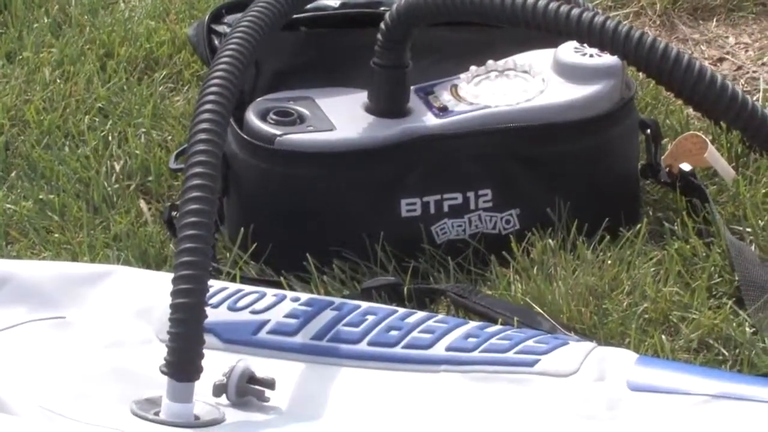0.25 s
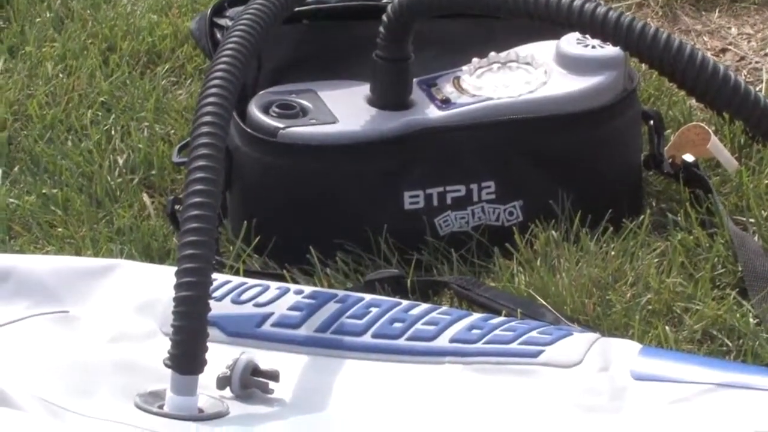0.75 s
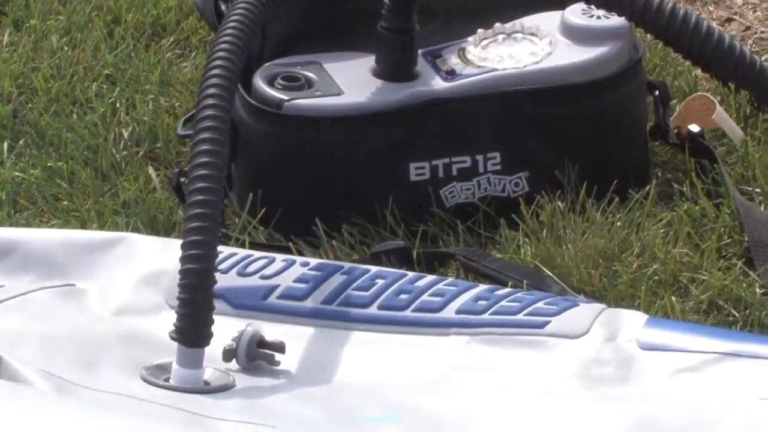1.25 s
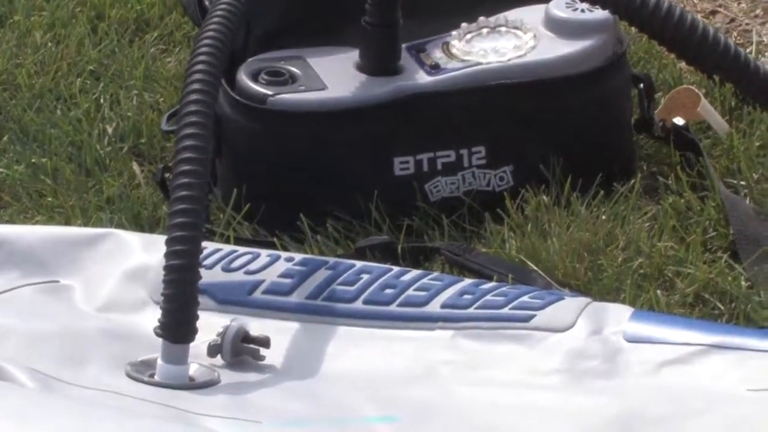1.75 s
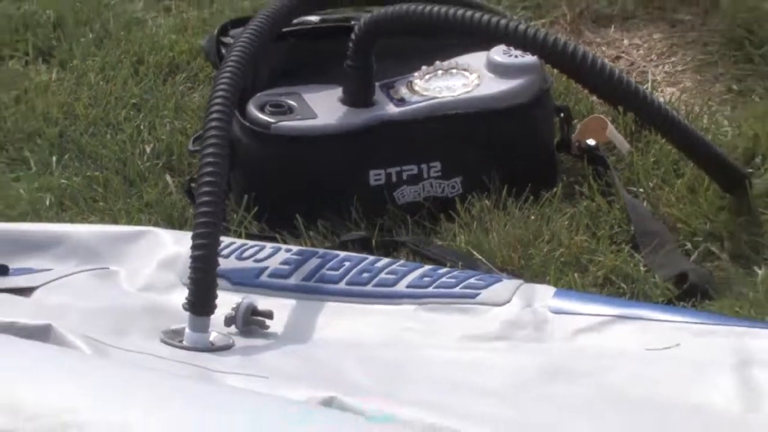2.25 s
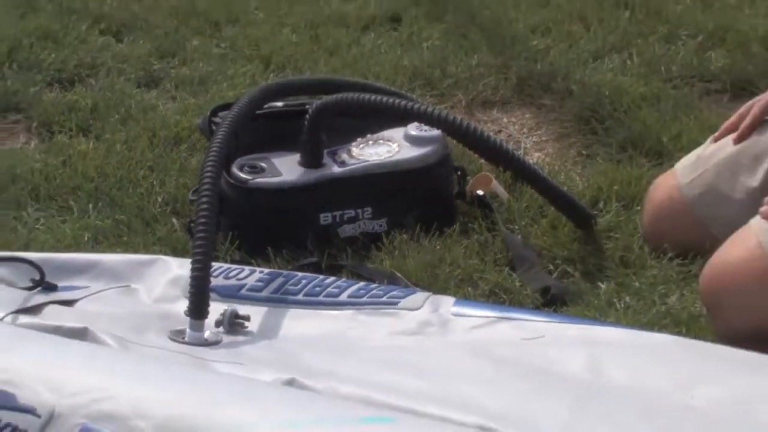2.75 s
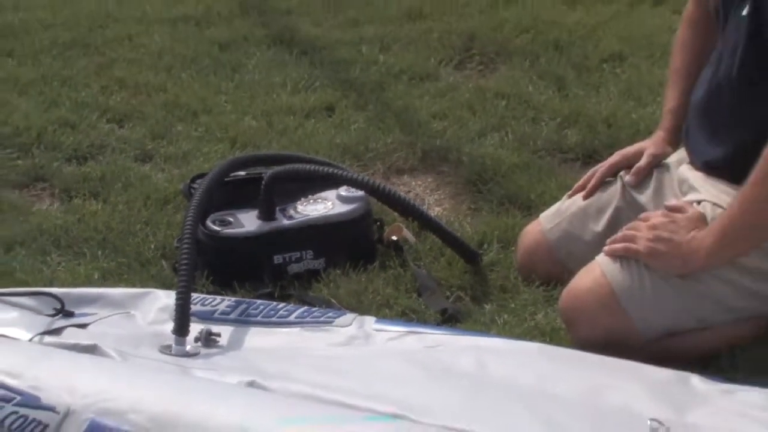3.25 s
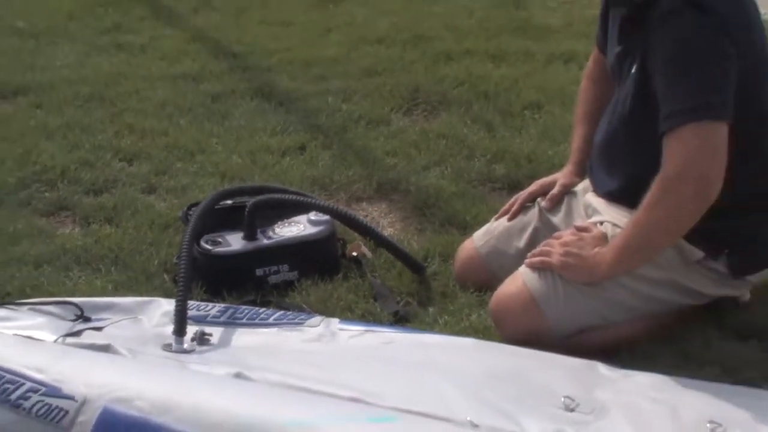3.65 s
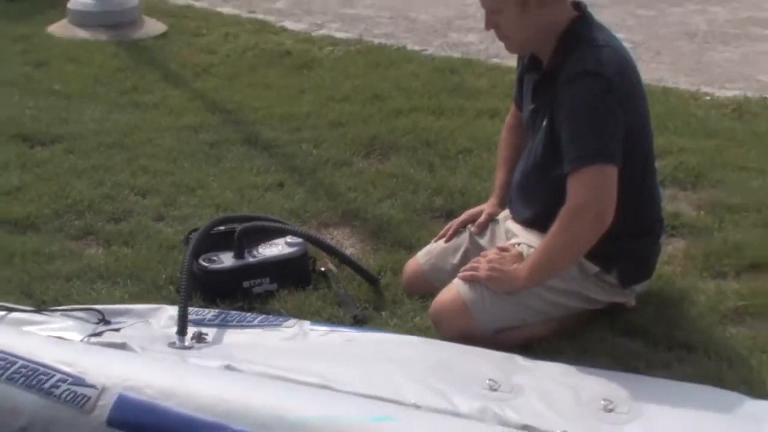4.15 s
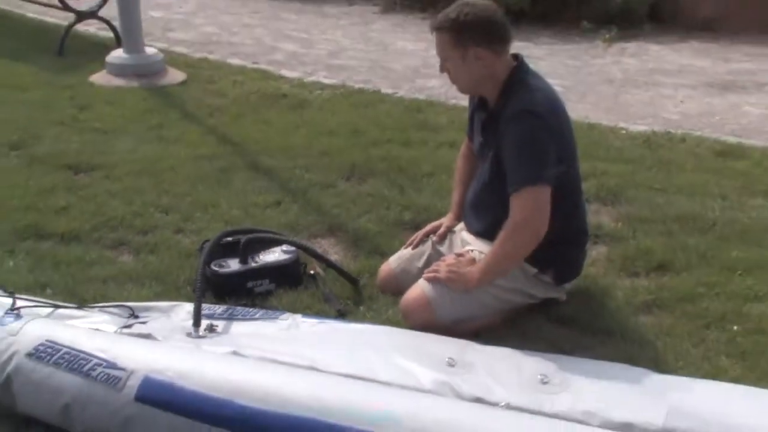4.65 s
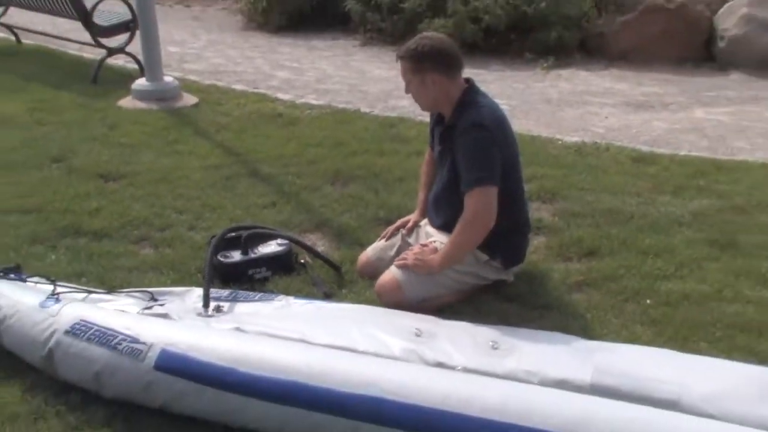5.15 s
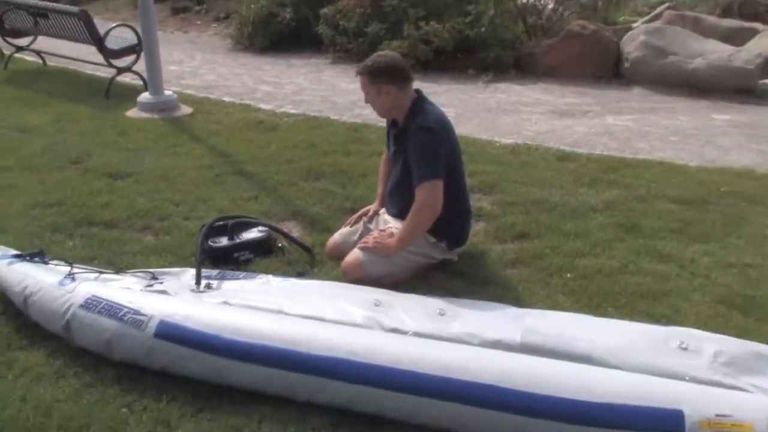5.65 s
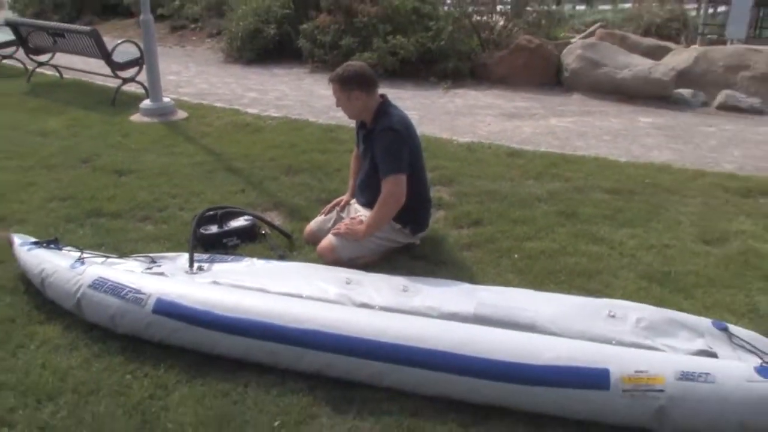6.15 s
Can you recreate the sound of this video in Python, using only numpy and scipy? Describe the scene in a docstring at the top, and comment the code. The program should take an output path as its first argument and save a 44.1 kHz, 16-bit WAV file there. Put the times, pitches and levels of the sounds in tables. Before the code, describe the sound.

Loud continuous electric inflator hum, nearly one pure pitch, rises slightly at the start, then holds while air rushes faintly through a hose outdoors.

```python
"""Turbine pump filling a boat

On a lawn, a small turbine pump blows air through a ribbed hose into a boat.
The rotor, just reaching full speed, is a set of cosines: a hum at its turning rate, overtones, a blade whine.
Turbulent air is noise through resonances: the hose rings, the casing and valve hiss and brighten as the
hull fills. Behind them lie a faint outdoor rumble and a low drone."""
import sys
import numpy as np
from scipy import signal
from scipy.io import wavfile

SR = 44100
rng = np.random.default_rng(int(sys.argv[2]) if len(sys.argv) > 2 else 0)


def store_pcm(level_fs):
    """Save levels as 16-bit WAV."""
    pcm = np.round(np.clip(level_fs, -1, 1) * 32767).astype(np.int16)
    wavfile.write(sys.argv[1], SR, np.atleast_2d(pcm).T)


N = 281886  # length in samples


def from_db(db):
    """Turn decibels into a plain factor."""
    return 10 ** (np.asarray(db) / 20)


def rms_one(x):
    """Scale a signal to an rms level of 1."""
    return x / np.sqrt(np.mean(x ** 2) + 1e-20)


def in_time(rows):
    """Draw straight lines between timed rows; gives one curve per column after the time."""
    seconds, *columns = np.transpose(rows)
    return [np.interp(np.arange(N) / SR, seconds, column) for column in columns]


def drift(rate_hz):
    """Slow random movement with a spread of 1: noise smoothed twice, so little is left above the rate."""
    step = 40  # samples between computed points
    pole = np.exp(-2 * np.pi * rate_hz * step / SR)
    noise = rng.standard_normal(N // step + 2002)
    slow = signal.lfilter([1], [1, -2 * pole, pole * pole], noise)[2000:]  # skip the filter's start
    return np.interp(np.arange(N) / step, np.arange(len(slow)), rms_one(slow))


def turbulence(resonances, patchy_db, rate_hz):
    """Each resonance is rung by its own noise and flickers alone; the sum has rms 1."""
    out = np.zeros(N)
    for hz, width_hz, top_db in resonances:
        r = np.exp(-np.pi * width_hz / SR)
        stage = [(1 - r * r) / 2, 0, (r * r - 1) / 2, 1, -2 * r * np.cos(2 * np.pi * hz / SR), r * r]
        noise = rng.standard_normal(N + 8000)
        rung = signal.sosfilt([stage, stage], noise)[8000:]  # two passes give steep skirts
        out += from_db(top_db + patchy_db * drift(rate_hz)) * rung
    return rms_one(out)


def tone(angle, db):
    """A cosine of the given rms level."""
    return np.sqrt(2) * from_db(db) * np.cos(angle)


def by_state(row, short, filled):
    """Level in dB from the working level, the shortfall in speed and the filling of the hull."""
    at_speed_db, short_db, filled_db = row[:3]
    return at_speed_db + short_db * short + filled_db * filled


# Outdoor rumble. Each row: frequency in Hz, width of one filter pass in Hz, relative level at the top in dB.
RUMBLE_RESONANCES = [(19.5, 40, -18), (48, 26, -3), (75, 14, -1.5), (90, 15, 1), (124, 30, -1),
                     (167, 76, -6.5), (250, 117, -3.5)]
RUMBLE_DB = -55


def outdoor_rumble():
    """Faint rumble of the open air: noise in low, patchy bands."""
    return from_db(RUMBLE_DB) * turbulence(RUMBLE_RESONANCES, patchy_db=2.75, rate_hz=2.5)


# The drone swells and fades. Each row: time in seconds, level in dB.
DRONE_LEVELS = [(0, -62), (.5, -68), (1.2, -69), (2, -59), (3.2, -55.5), (4, -56.5), (4.8, -62),
                (5.5, -68.5), (6.39, -66)]
DRONE_HZ = 46.5


def low_drone():
    """One low cosine whose level swells, fades and wavers."""
    level_db = in_time(DRONE_LEVELS)[0] + 0.86 * drift(2.7)
    return tone(2 * np.pi * DRONE_HZ * np.arange(N) / SR, level_db)


# Valve resonances. Each row: frequency in Hz, width of one filter pass in Hz, relative level at the top in dB.
VALVE_RESONANCES = [(7330, 910, 0), (7930, 130, -0.5), (8100, 320, -3.5), (11620, 500, -5.5),
                    (12500, 770, -3)]
# Valve loudness: level at working speed in dB, dB gained while short of speed, dB gained as the hull fills.
VALVE_LEVEL = (-54.5, 1.1, 5.5)


def valve_jet(short, filled):
    """The jet at the valve: high bands of turbulence that grow clearly as the hull fills."""
    return from_db(by_state(VALVE_LEVEL, short, filled)) * turbulence(VALVE_RESONANCES, 0.8, rate_hz=6.5)


# Casing resonances. Each row: frequency in Hz, width of one filter pass in Hz, relative level at the top in dB.
CASING_RESONANCES = [(2610, 180, -1), (2900, 210, -10.5), (3250, 990, -2), (3970, 980, -3.5),
                     (4520, 540, -5.5), (5075, 900, 1.5), (5495, 240, 0), (5810, 1100, -1), (6490, 320, -1),
                     (8920, 1800, -13), (9900, 580, -10), (10780, 1150, -10), (13320, 660, -0.5),
                     (13800, 540, -18), (15000, 840, -13)]
# Casing loudness: level at working speed in dB, dB gained while short of speed, dB gained as the hull fills.
CASING_LEVEL = (-48, 0.34, 1)


def casing_hiss(short, filled):
    """Air hissing from the casing: broad bands of turbulence."""
    return from_db(by_state(CASING_LEVEL, short, filled)) * turbulence(CASING_RESONANCES, 0.85, rate_hz=6.3)


# Hose resonances. Each row: frequency in Hz, width of one filter pass in Hz, relative level at the top in dB.
HOSE_RESONANCES = [(357, 270, -7), (461.5, 55, 9), (648.6, 114, 0), (696, 103, -3), (774, 80, -7),
                   (948, 163, -8.5), (1121, 184, -5), (1294, 230, -9.5), (1417, 72, -18), (1488, 98, -3.5),
                   (1542, 110, -2), (1669, 94, -0.5), (1757, 150, -7), (1980, 170, -5.5), (2105, 210, -11),
                   (2226, 110, -9), (2335, 83, -13.5), (2480, 60, -18)]
# Hose loudness: level at working speed in dB, dB gained while short of speed, dB gained as the hull fills.
HOSE_LEVEL = (-38, -3, 0.54)


def hose_rush(short, filled):
    """Turbulent air rings the many resonances of the ribbed hose."""
    return from_db(by_state(HOSE_LEVEL, short, filled)) * turbulence(HOSE_RESONANCES, 0.52, rate_hz=3.2)


def air(angle, short, filled):
    """Casing and valve flutter together; all the air throbs slightly once a turn."""
    throb = from_db(0.6 * np.sin(angle))
    flutter = from_db(0.31 * drift(2.6) + 0.36 * drift(40))
    hiss = casing_hiss(short, filled) + valve_jet(short, filled)
    return throb * (hose_rush(short, filled) + flutter * hiss)


# Which multiples of the turning rate the overtones have, in the order of the rows below.
OVERTONE_MULTIPLES = [2, 4, 5, 6, 7, 9, 27]
# Each row: level at working speed in dB, dB gained while short of speed, dB gained as the hull fills,
# sharpness of settling (a power of the shortfall, no unit), slow wander once at speed in dB.
OVERTONE_LEVELS = [(-41, -4, 0.2, 4, 0.37), (-55, 12.5, 4.5, 2.1, 1), (-58, -13, 2, 6, 1.5),
                   (-71, 23, -4, 1.7, 2.5), (-59, 7, 2.1, 0.98, 1.2), (-57.5, -3, -3.5, 1.1, 2),
                   (-66.5, 7, 5, 3.7, 2.5)]
WANDER_HZ = 0.95
# The strong third multiple and the blade whine, as multiples of the turning rate.
SWELLING_MULTIPLES = [3, 18]
# They swell and fade. Each row: time in seconds, third multiple in dB, blade whine in dB.
SWELLING_LEVELS = [(0, -50, -74), (.16, -43.5, -56), (.4, -44.5, -65), (.7, -39, -67), (1.1, -40.5, -67),
                   (1.5, -39, -66), (2.05, -40, -61), (2.5, -42, -66), (2.95, -38, -68), (3.4, -38, -57),
                   (3.85, -39, -56), (4.3, -40.5, -61), (4.75, -39.5, -56), (5.3, -39.5, -65),
                   (6.39, -40.5, -64)]
# Faint overtones, as multiples of the turning rate, then the average level of each in dB.
FAINT_MULTIPLES = [8, 11, 12, 15, 17]
FAINT_LEVELS = [-66.5, -74, -71, -67.5, -66.5]


def rotor(angle, hum_db, short, filled, low_waver_db, high_waver_db):
    """Unbalance pushes once a turn; multiples 2 and 3 peak with it, higher ones start at random
    phases and waver more."""
    levels = []
    for row in OVERTONE_LEVELS:
        sharpness, wander_db = row[3:]
        wander = wander_db * (1 - short) * drift(WANDER_HZ)
        levels.append(by_state(row, short ** sharpness, filled) + wander)
    levels += in_time(SWELLING_LEVELS) + list(FAINT_LEVELS)
    multiples = [*OVERTONE_MULTIPLES, *SWELLING_MULTIPLES, *FAINT_MULTIPLES]

    out = tone(angle, hum_db)
    for multiple, level_db in zip(multiples, levels):
        if multiple <= 3:
            start_phase, waver_db = 0, low_waver_db
        else:
            start_phase, waver_db = rng.uniform(0, 2 * np.pi), high_waver_db
        out += tone(multiple * angle + start_phase, level_db + waver_db * drift(12))
    return out


# The rotor's run. Each row: time in seconds, speed in turns per second, level of the hum in dB.
ROTOR_RUN = [(0, 446.0, -20.6), (0.14, 450.9, -20.8), (0.28, 455.6, -20.3), (0.42, 458.1, -19.8),
             (0.56, 458.7, -20.1), (0.78, 459.8, -20.4), (1.35, 459.2, -20.8), (1.9, 460.6, -20.2),
             (2.35, 459.6, -20.3), (2.65, 461.4, -19.9), (3.15, 460.2, -19.5), (3.52, 460.3, -19.4),
             (3.77, 461.6, -19.3), (4.15, 460.4, -19.3), (4.28, 461.0, -19.5), (4.53, 460.4, -19.6),
             (4.78, 462.0, -19.0), (5.15, 461.1, -19.3), (5.65, 461.3, -19.4), (5.8, 462.9, -19.5),
             (6.05, 462.5, -18.9), (6.39, 461.7, -19.4)]
START_TURNS, FULL_TURNS = 446, 459.5  # turns per second at the start and at working speed


def scene():
    """Pump and surroundings, in mono."""
    turns, hum_db = in_time(ROTOR_RUN)
    angle = 2 * np.pi * np.cumsum(turns) / SR + np.pi / 2  # shaft angle in radians
    short = np.clip((FULL_TURNS - turns) / (FULL_TURNS - START_TURNS), 0, 1)  # shortfall in speed, 0-1
    filled = np.arange(N) / N  # the hull fills steadily, 0-1
    surroundings = outdoor_rumble() + low_drone()
    spinning = rotor(angle, hum_db, short, filled, low_waver_db=0.68, high_waver_db=1.1)
    return (surroundings + air(angle, short, filled) + spinning)[None]


LOW_CUT_HZ, TOP_CUT_HZ = 12, 15050


def record(dry):
    """The microphone drops the deep bass; the top is cut steeply."""
    low_cut = signal.butter(2, LOW_CUT_HZ, "high", fs=SR, output="sos")
    top_cut = signal.ellip(14, 0.05, 74, TOP_CUT_HZ, fs=SR, output="sos")
    return signal.sosfilt(top_cut, signal.sosfilt(low_cut, dry))


dry = scene()
out = record(dry)
store_pcm(out)
```